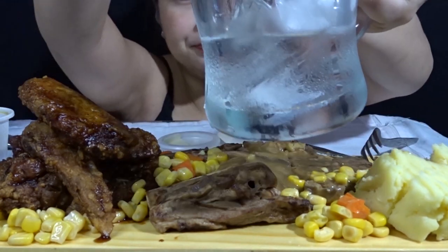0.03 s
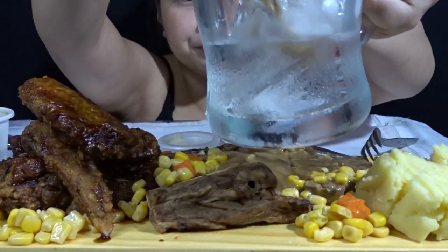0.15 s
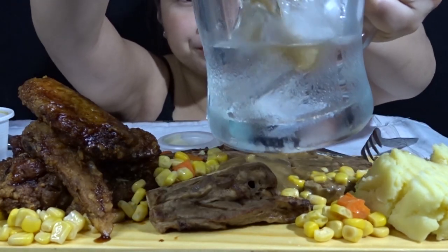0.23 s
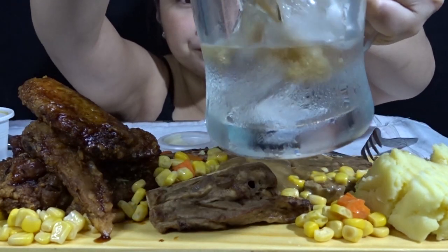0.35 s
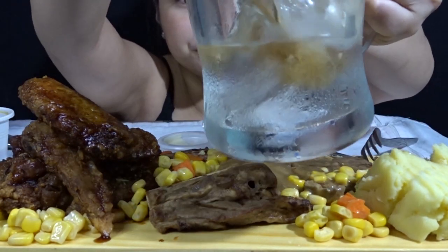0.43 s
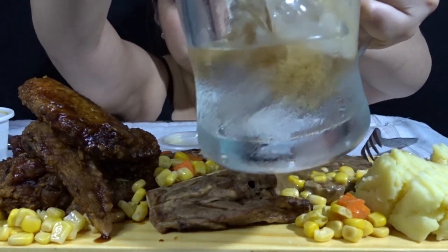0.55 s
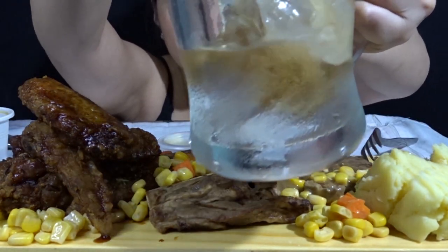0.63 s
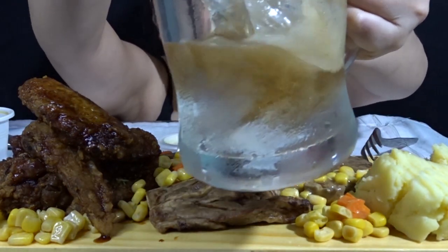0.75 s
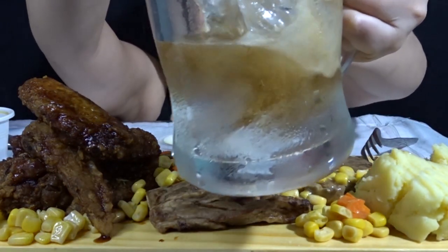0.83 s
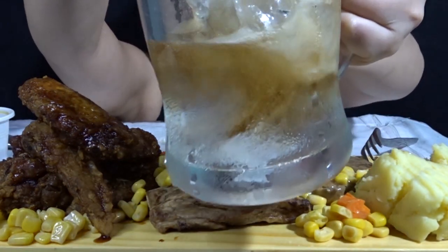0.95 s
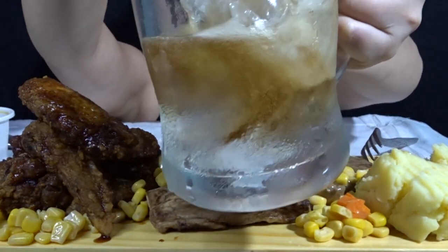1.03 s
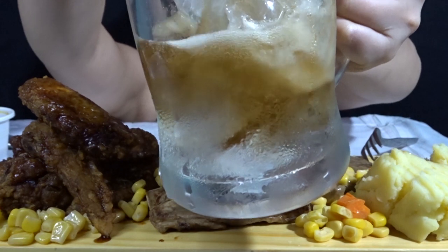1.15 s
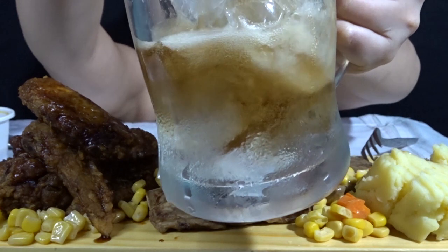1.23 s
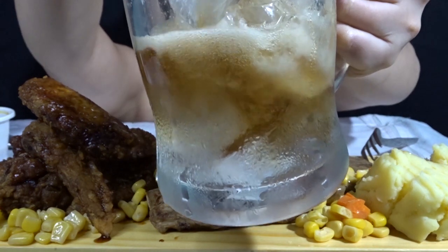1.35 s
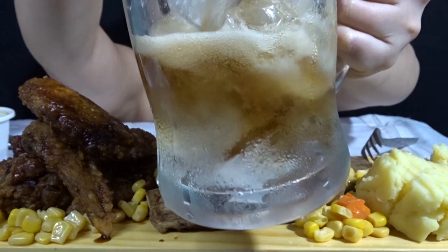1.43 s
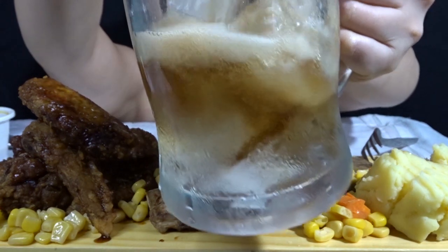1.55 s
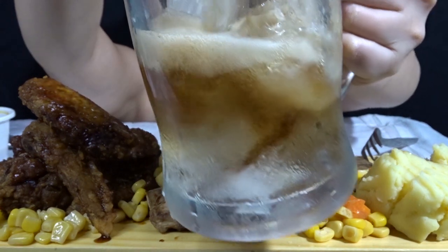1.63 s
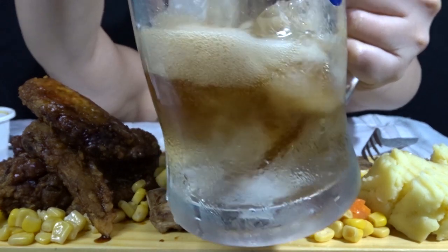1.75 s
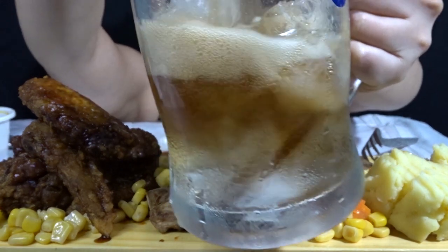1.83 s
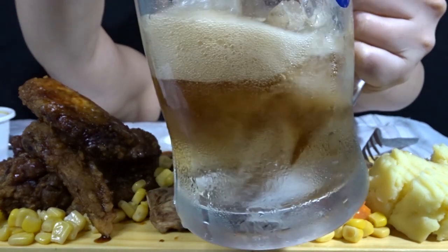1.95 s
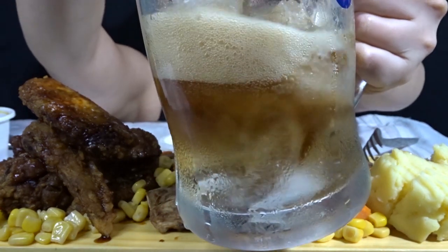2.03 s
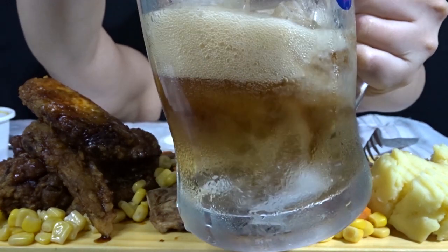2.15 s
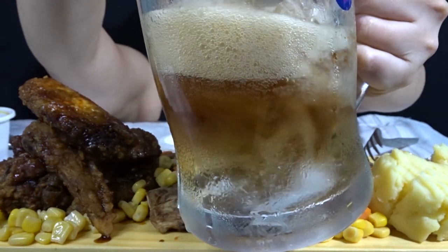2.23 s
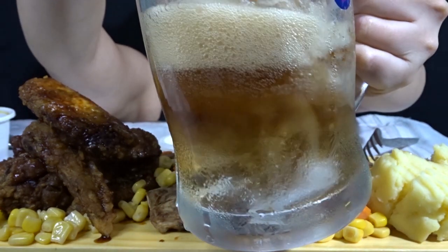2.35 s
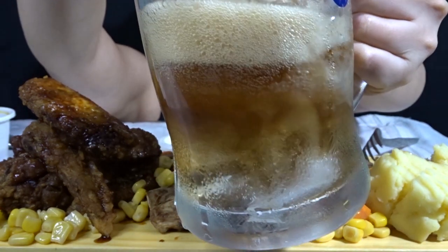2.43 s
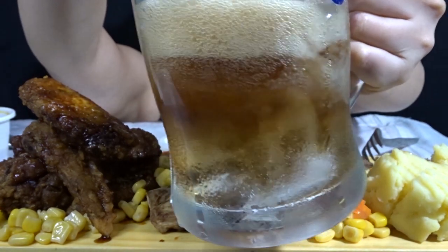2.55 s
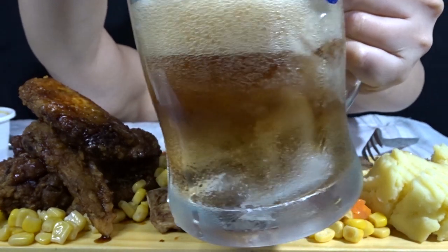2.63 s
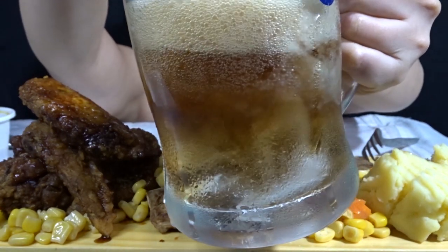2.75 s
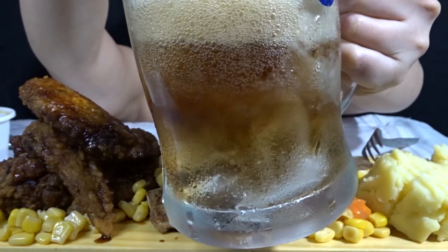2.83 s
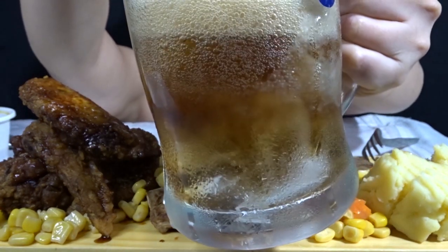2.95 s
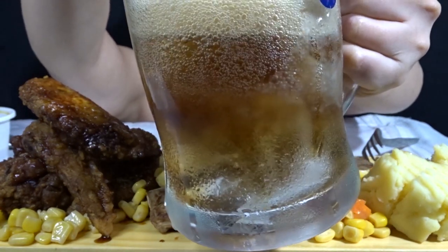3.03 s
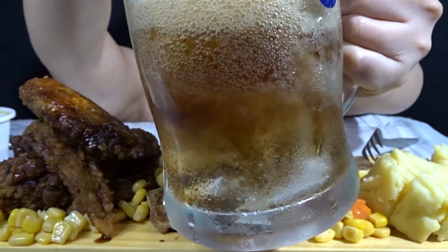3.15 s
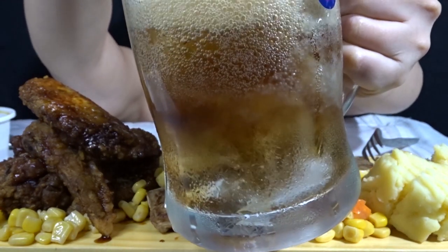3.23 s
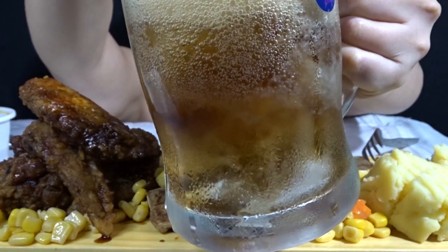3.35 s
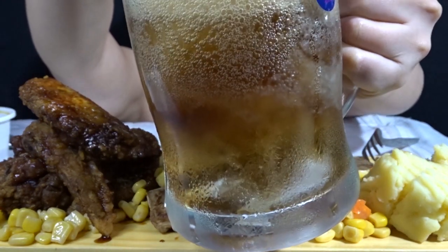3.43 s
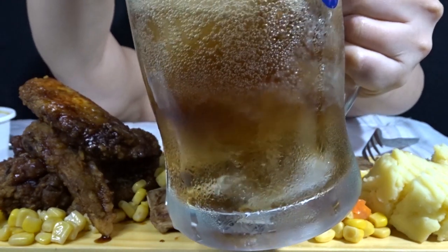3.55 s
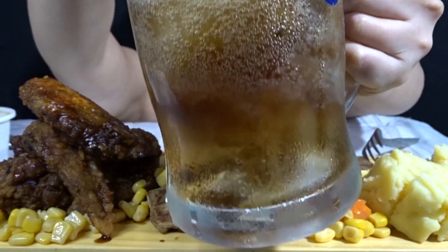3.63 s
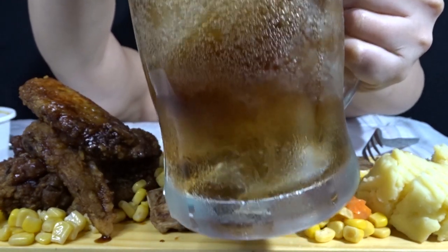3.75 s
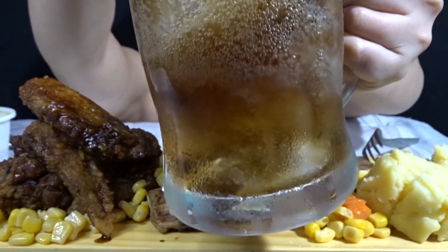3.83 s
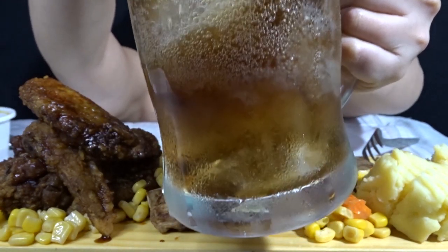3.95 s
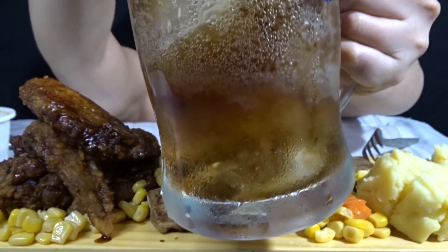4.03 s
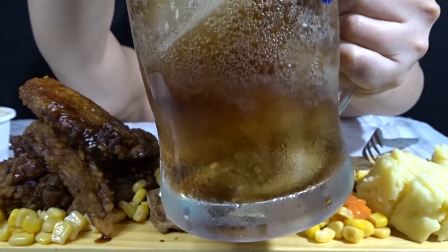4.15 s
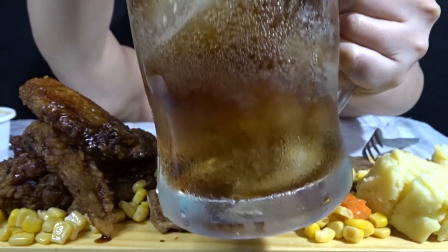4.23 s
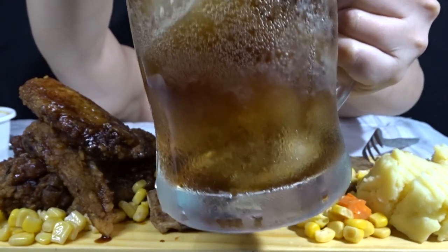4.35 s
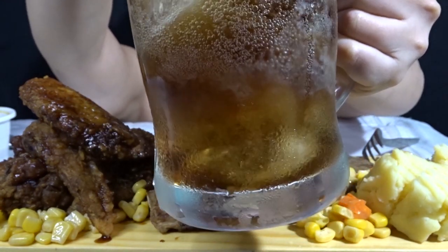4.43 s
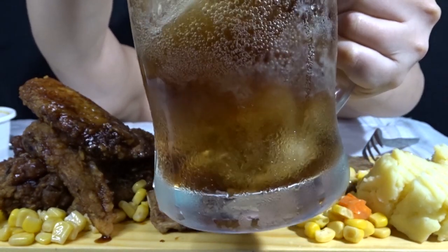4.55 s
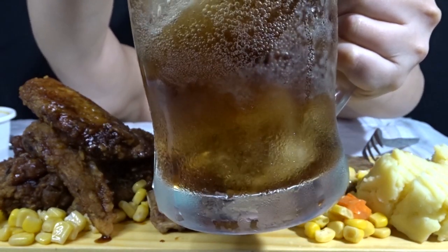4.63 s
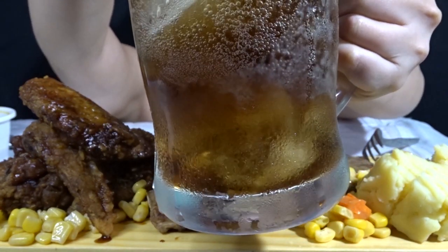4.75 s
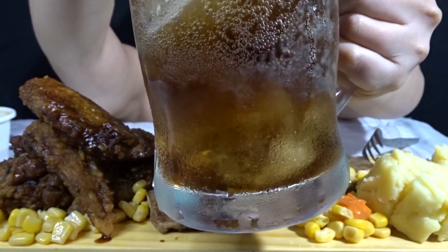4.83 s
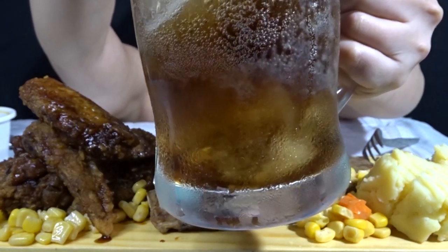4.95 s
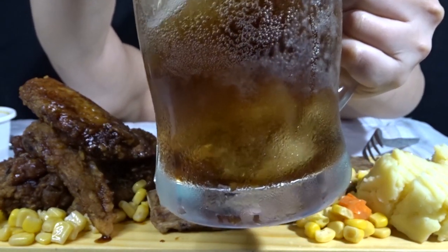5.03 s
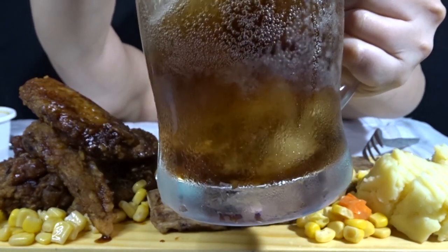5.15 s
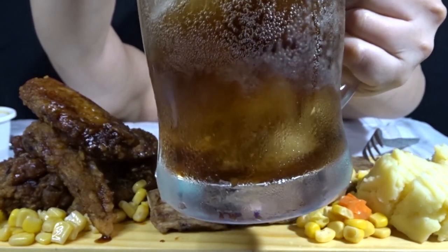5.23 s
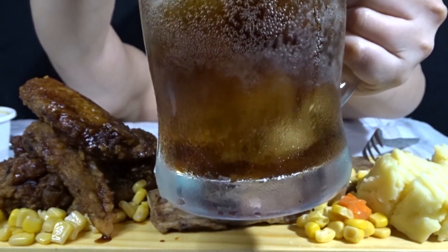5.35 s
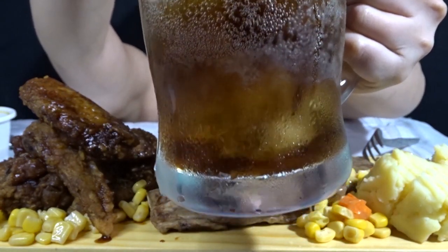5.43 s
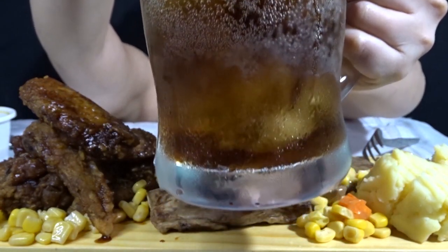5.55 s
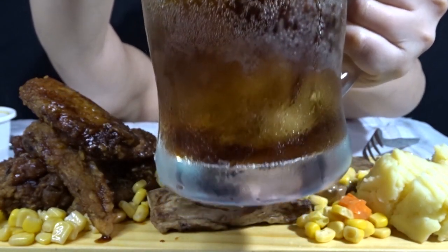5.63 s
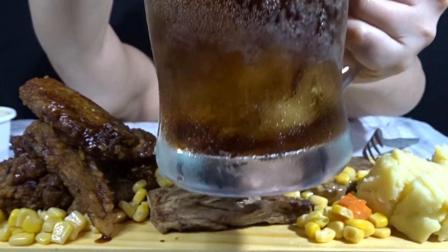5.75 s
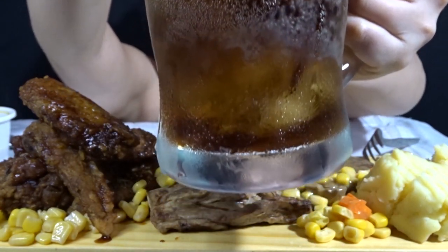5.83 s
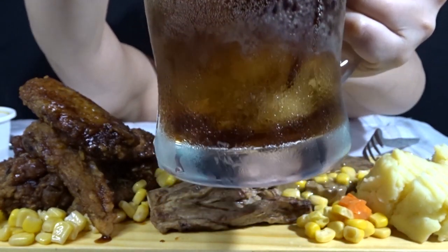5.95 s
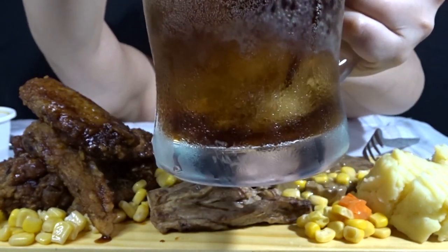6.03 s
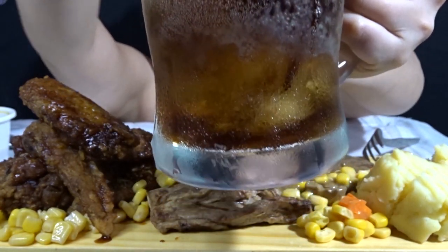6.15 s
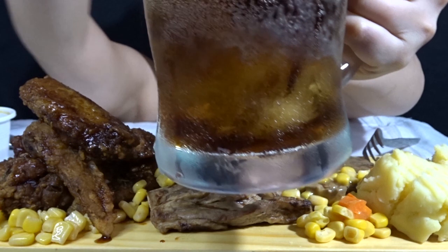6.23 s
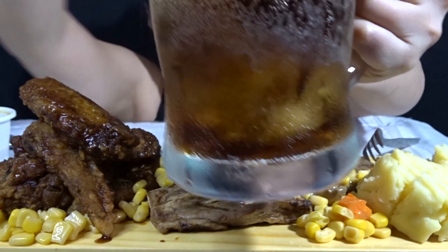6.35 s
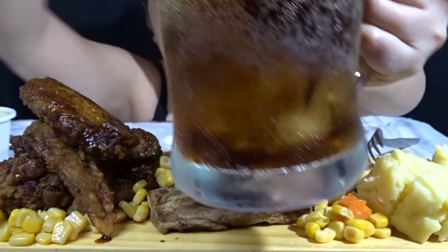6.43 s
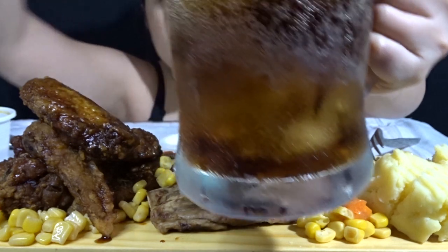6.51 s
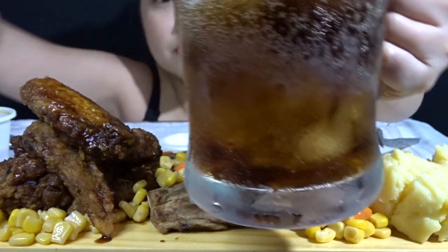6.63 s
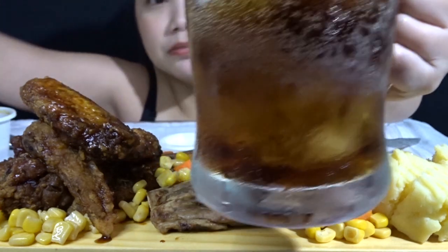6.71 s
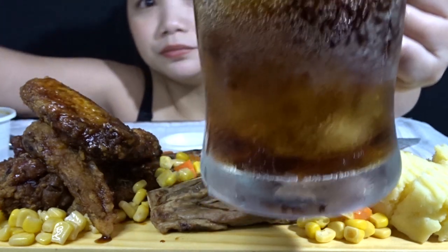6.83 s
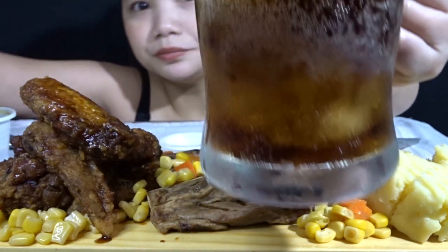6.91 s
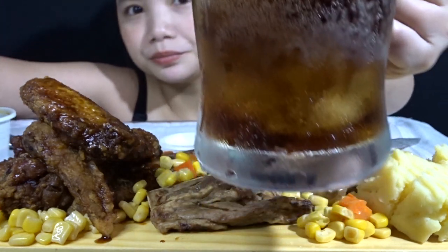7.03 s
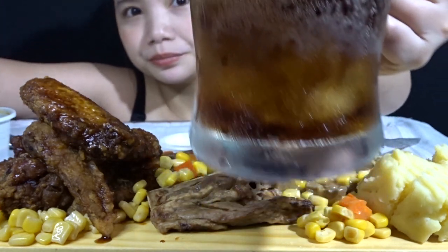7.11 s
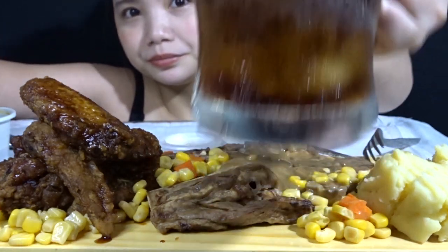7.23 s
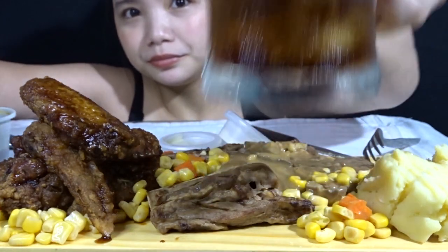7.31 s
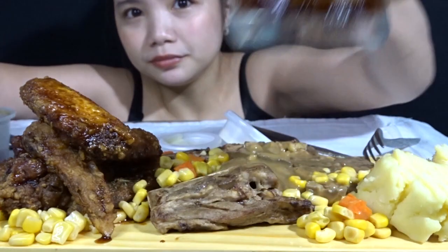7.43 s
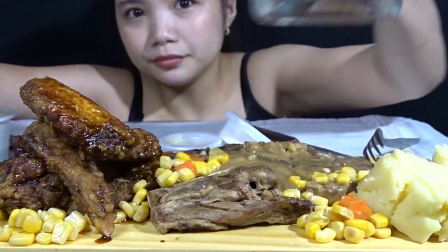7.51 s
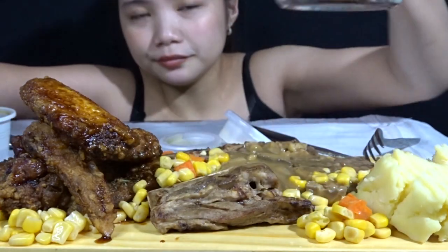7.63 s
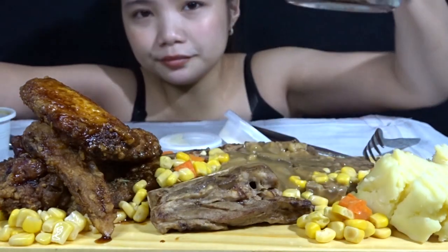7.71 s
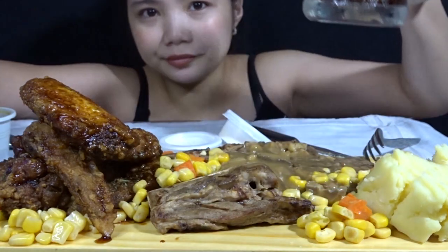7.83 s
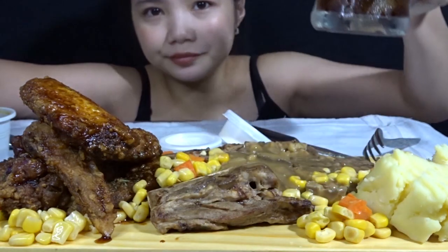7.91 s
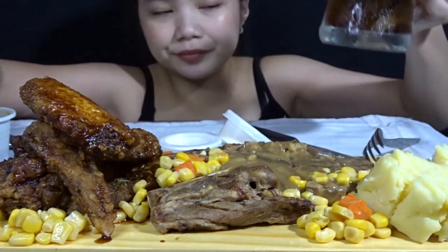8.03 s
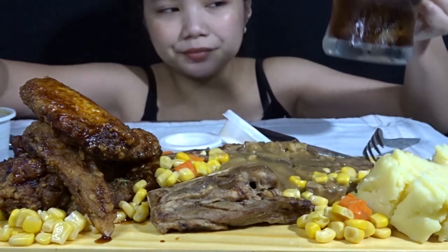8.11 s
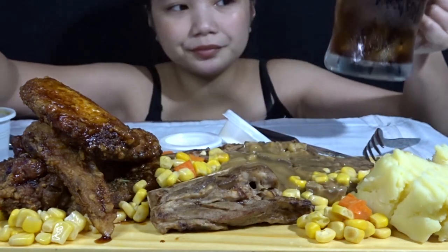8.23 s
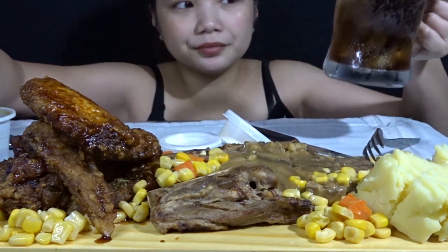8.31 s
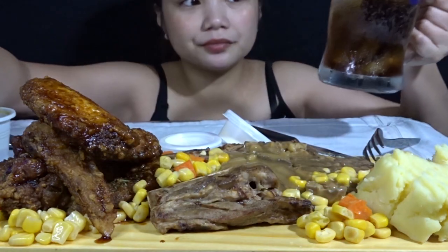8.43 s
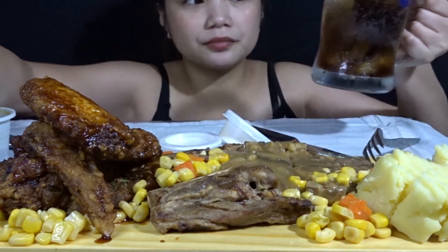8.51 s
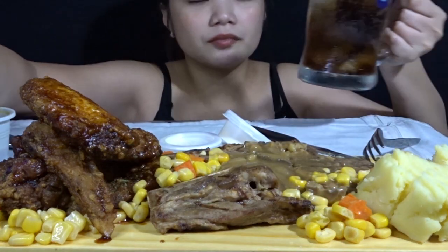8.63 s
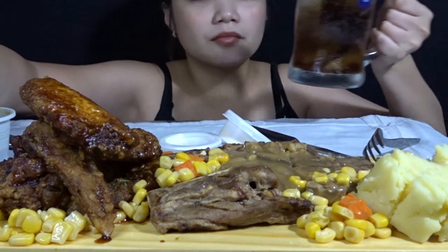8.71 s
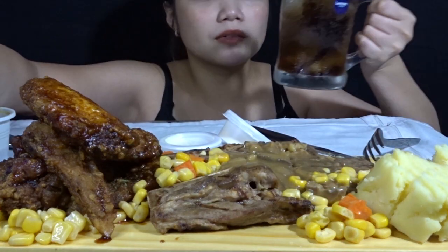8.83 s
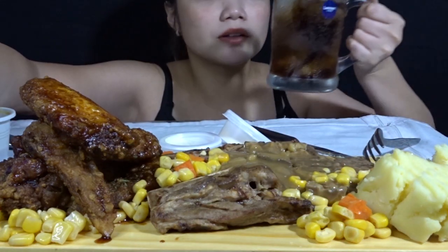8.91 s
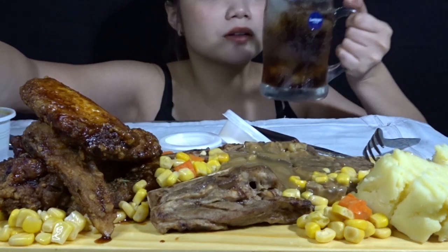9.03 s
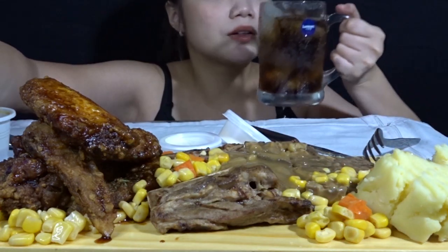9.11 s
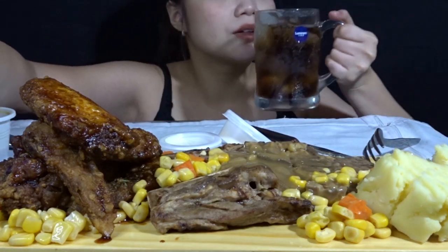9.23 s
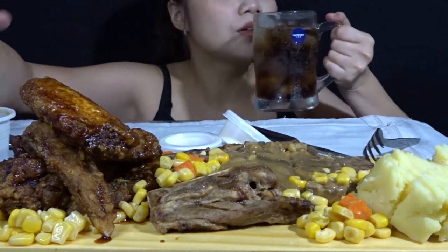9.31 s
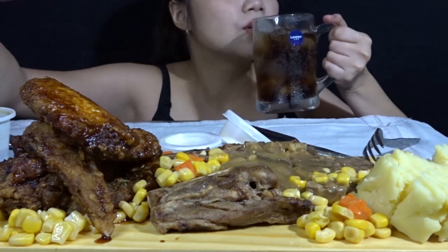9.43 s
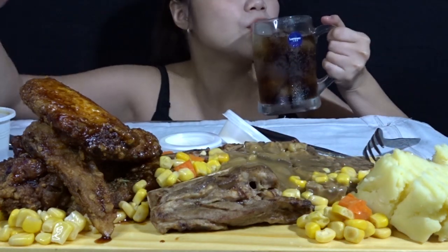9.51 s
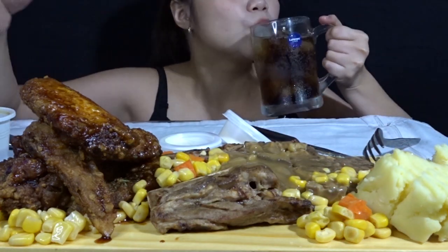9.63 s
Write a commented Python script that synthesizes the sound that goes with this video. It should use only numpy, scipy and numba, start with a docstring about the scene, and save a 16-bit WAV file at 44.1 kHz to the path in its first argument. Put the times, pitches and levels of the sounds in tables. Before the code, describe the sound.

Close-up carbonated pour over ice cubes: quick bubbly plops, dense bright fizz, sparse glassy clinks, then the hiss sinks into quiet room noise.

```python
"""Fizzy drink poured over ice.

A glass mug is held close to a stereo microphone in a quiet room. First splashes plop: rising, dying sines.
Foam then hisses: dense random clicks and noise in bands, coloured by moving resonances of the air above
the drink, whose pitch climbs as the mug fills. Cavities between the cubes gulp; ice thuds and knocks
as decaying modes and noise snaps. The mug is carried away and the hiss sinks into steady room noise."""
import sys
import numpy as np
from scipy import signal
from scipy.io import wavfile
from scipy.ndimage import uniform_filter1d
from numba import njit

SR = 44100
rng = np.random.default_rng(int(sys.argv[2]) if len(sys.argv) > 2 else 0)


def master(y):
    """Save y as 16-bit WAV."""
    cut = np.clip(np.atleast_2d(y).T, -1, 1)
    pcm = np.round(cut * 32767)  # scale
    wavfile.write(sys.argv[1], SR, pcm.astype(np.int16))


def natural_amplitude(level_db):
    """Convert a level in decibels to a linear amplitude factor, elementwise."""
    exponent = np.asarray(level_db, float) / 20
    return 10 ** exponent


N = 426447

# Levels in the tables are relative; each source adds its own trim.
# steady room noise: pitch_hz, density_db
ROOM_SPECTRUM = [(18, -68), (30, -28), (110, -15.5), (213, -18), (532, 1), (1140, -16), (1260, -8),
                 (1720, 2), (1970, -1.5), (3500, -1), (4200, -13), (6000, -5), (9190, -12), (12000, -11),
                 (14000, -15), (16000, -20)]
# its stereo width: pitch_hz, side_over_mid_db
ROOM_WIDTH = [(60, -9), (200, 2), (380, -17), (800, 11), (2000, 3), (4400, 7), (8000, 10), (15000, -2)]
# foam: time_s, hiss_db, fine_bubbles_db
FOAM_LEVELS = [(0, -57.5, -87), (.12, -66, -69), (.16, -51, -62), (.4, -45.5, -50), (.53, -37, -42.5),
               (.72, -32.5, -37.5), (1.0, -30, -37.5), (1.5, -30.5, -40.5), (2.1, -30.5, -39.5),
               (2.8, -30.5, -40.5), (3.4, -30.5, -40), (3.55, -29.5, -39), (3.8, -29.5, -39),
               (4.4, -30.5, -38.5), (5.55, -30.5, -40), (6.1, -31.5, -41.5), (6.3, -32.5, -42),
               (6.6, -32.5, -43.5), (7.05, -32.5, -44), (7.33, -28.5, -47), (7.45, -33, -47),
               (7.55, -34, -48.5), (7.75, -37, -49.5), (7.95, -40, -51.5), (8.1, -46.5, -53),
               (8.45, -47, -56), (8.55, -49, -56), (8.6, -47, -54), (8.7, -49, -62), (8.85, -58.5, -60.5),
               (9.67, -66.5, -67.5)]
# foam spectrum: pitch_hz, density_db
FOAM_SPECTRUM = [(25, -33), (60, -44), (150, -44.5), (240, -43.5), (330, -34), (430, -26), (600, -23),
                 (1000, -13.5), (1500, -6.5), (2000, -5.5), (2600, 0), (3500, -1), (5000, -2), (6800, -7),
                 (8200, -7.5), (9400, -9.5), (10300, -11.5), (11000, -15.5), (11800, -16), (12600, -22),
                 (13600, -20.5), (14800, -25.5), (16000, -31.5)]
# foam stereo width: pitch_hz, side_over_mid_db
FOAM_WIDTH = [(60, -3), (110, -2.5), (200, -19), (380, -11.5), (700, -10.5), (1290, -14), (2380, -21),
              (4400, -11.5), (8120, -13), (15000, -7)]
# drift of the bubble size mix: time_s, coarse_lift_db, middle_lift_db, left_over_right_db
BUBBLE_MIX = [(0, 7, 9, 3), (.3, -4, -2, -1.5), (.9, -3, 3.5, 0), (1.6, 1.5, -1, 0.43),
              (2.4, -3, 2.5, -0.1), (3.1, 5, 4, 0.5), (3.6, 2, 3.5, -0.2), (4.2, 5.5, -1, 0),
              (4.8, 3, -1.5, 0), (5.5, 3.5, -2.5, -0.1), (6.0, 1, -2.5, -0.2), (6.3, 3.5, -4, 1),
              (6.7, 0.5, -4.5, -1), (7.1, -4, -3, -1.5), (7.4, 2.5, -7, -1.16), (7.8, -3, -14.5, -2.5),
              (8.2, 3, -4, -1.5), (8.6, -0.5, -2, -1), (9.0, 3.5, -4.5, -0.5), (9.67, 11, 4, 1)]
# treble drift: time_s, mist_lift_db, top_lift_db, high_mode_hz, high_mode_db
TREBLE_DRIFT = [(0, 0, 0, 7000, 3), (.4, 2, -7, 7000, 1.5), (.8, 2, 1, 8600, 1), (1.5, 0.5, -2, 9200, 3),
                (2.0, -2.5, 0, 7800, -2.5), (2.4, 1, 1, 8140, 3), (3.0, 2, 2, 9070, 4),
                (3.6, -1, 4.5, 9900, 4), (4.3, -1, 1, 10000, 2), (5.5, 0.5, 2, 10000, 3.5),
                (6.2, 2.5, -1, 10000, 0.5), (7.2, 2.5, 1, 10500, -0.5), (7.8, 1, 7, 11600, 2),
                (8.3, 5, 4.5, 11500, -1), (8.9, -3, -2, 7400, -3), (9.67, 0, -2, 7400, 1)]
# air modes of the mug: time_s, column_db, cross_hz, cross_db, rim_db
AIR_MODES = [(0, -2, 2300, -4, -3), (.36, 17, 2240, 17, 5), (.45, 24, 2230, 11.5, 6),
             (.7, 20.5, 2440, 13.5, 13.5), (.85, 19, 2440, 12, 10), (.9, 19.5, 2557, 16.5, 10),
             (1.0, 11.5, 2750, 8.5, 11), (1.3, 16.5, 3010, 5, 5.5), (1.7, 13, 3170, 2.5, 3),
             (2.0, 12.5, 2370, 7.5, 2.5), (3.4, 5, 2790, 4.5, 2), (3.65, 6, 2676, 4.5, 4.5),
             (4.0, 3.5, 2460, 4.5, 5.5), (7.4, 5, 2260, 5, 5.5), (7.5, 5, 2510, 4, 6),
             (7.53, 6, 5060, 4, 7), (7.75, 13, 4900, 6.5, 9), (7.95, 9, 4900, 7.5, 8),
             (8.1, 10, 5300, 6, 6), (8.2, 6, 5300, 7, 8), (8.35, 6, 5200, 6, 11), (8.5, 3, 5200, 4, 12),
             (8.6, 5.5, 5020, 2.5, 6), (9.67, 16.5, 5000, 4, -1)]
# drops spattering on bare ice, then cubes rattling: time_s, level_db
SPATTER_LEVELS = [(0, -78.5), (.12, -78), (.15, -52), (.2, -53), (.24, -50), (.3, -53), (.37, -49),
                  (.44, -42.5), (.52, -32), (.75, -53), (1.2, -49), (3.5, -56), (7.0, -45), (7.5, -47.5),
                  (7.7, -53), (7.95, -56), (8.05, -62), (8.2, -75.5), (8.5, -62), (8.55, -68), (8.66, -58),
                  (8.7, -50), (8.75, -59.5), (8.85, -67), (9.67, -69.5)]
# short broad clicks, most at the onset of splashes and knocks: start_s, level_db, centre_hz
ONSET_CLICKS = [(0.1369, -38, 3000), (.169, -34, 4500), (.187, -27, 5000), (0.2537, -30, 2600),
                (.267, -36.5, 2500), (.2815, -41, 2000), (.4045, -34, 2000), (.424, -37, 2200),
                (.151, -39, 2600), (.2235, -40, 4000), (.3045, -42, 4500), (0.379, -31.5, 2500),
                (.554, -26, 2400), (.6635, -26, 4000), (.695, -36.5, 2500), (0.526, -11.5, 4600),
                (.583, -27.5, 5000), (.624, -20.5, 4200), (.683, -16, 4520), (.705, -20, 6000),
                (0.7426, -26, 3020), (.783, -25, 5500), (0.879, -27, 1860), (3.5313, -25, 1600),
                (7.456, -20.5, 2000), (7.443, -26.5, 1300), (7.462, -25, 2800), (7.607, -32, 2400),
                (7.612, -32, 4000), (7.734, -33, 2600), (7.8125, -28, 2600), (7.838, -25, 3500),
                (7.991, -34, 3500), (8.006, -30, 4000), (8.135, -38, 4970), (8.24, -34.5, 4000),
                (8.246, -33, 3500), (8.686, -26, 4300), (8.7028, -29, 4000), (8.908, -40, 7500),
                (9.078, -46.5, 10000), (8.7075, -30.5, 4500), (9.3561, -38, 1700), (9.375, -44, 3200),
                (9.489, -40, 1900)]
# splashes: start_s, first_bubble_db, first_bubble_hz, second_bubble_db, second_bubble_hz
SPLASHES = [(.137, -45, 1745, -47, 3170), (0.151, -35, 2700, -36.5, 3130), (.157, -45, 2610, -38, 4360),
            (.169, -26.5, 2443, -38.5, 2940), (0.188, -32.5, 3120, -23.5, 3330),
            (.196, -29, 3600, -36, 4300), (.207, -40, 2660, -29, 4400), (.215, -38, 2500, -37.5, 3400),
            (0.2233, -33.5, 1260, -44, 3230), (.253, -29.5, 1544, -37, 3190),
            (.265, -31, 1635, -46.5, 3450), (.279, -33, 1250, -48, 3180), (0.3048, -13, 1850, -24, 3560),
            (.319, -29, 1870, -40.5, 3500), (.333, -28, 1800, -42.5, 5500), (.343, -33, 1900, -36, 3300),
            (.355, -42.5, 2100, -42, 3700), (.378, -21, 1170, -33, 3700), (0.381, -18, 1910, -29, 2600),
            (0.404, -26, 1008, -46.5, 3530), (0.423, -23, 2450, -38.5, 4580), (.435, -36, 3300, -36, 4500),
            (0.458, -31.5, 1005, -29, 3600), (0.489, -19, 2400, -36, 3730), (0.5259, -16, 1900, -11, 4350),
            (0.5264, -23.5, 6330, -31, 3000), (.554, -17.5, 2320, -35, 3640), (.572, -28, 3800, -24, 3610),
            (.579, -28, 3500, -26, 4900), (.587, -25, 2112, -34, 3600), (.6235, -25.5, 1190, -23, 3740),
            (.6635, -17, 3480, -28, 4000), (0.6832, -20, 3910, -16, 4400), (.695, -15.5, 2280, -33, 3630),
            (.704, -25.5, 2430, -30, 6500), (0.718, -20, 3680, -24, 3650), (0.7408, -20, 2370, -22, 3260),
            (.7825, -28, 7500, -16, 5000), (.832, -19, 3330, -36, 4000), (.845, -22, 3430, -36, 4000),
            (0.8812, -14.5, 2140, -19, 3270), (.889, -20, 2600, -34, 3300), (.912, -26.5, 2650, -34, 3500)]
# drink closing over cavities between cubes: start_s, level_db, pitch_hz
CAVITIES = [(0.386, -32, 1000), (0.407, -37, 1000), (.455, -31, 955), (.47, -32, 955), (.488, -25, 932),
            (0.501, -30, 950), (0.479, -28, 1150), (0.494, -25, 1306), (0.503, -26, 1466),
            (0.514, -39, 992), (.955, -28, 1100), (0.97, -28, 1120), (1.391, -54, 338), (1.88, -46, 537),
            (2.74, -47, 304), (3.45, -56, 350), (4.079, -53.5, 312), (4.15, -65, 160.5), (4.2, -56, 268),
            (4.3, -58, 380), (4.64, -48, 433), (4.672, -54, 436), (5.369, -60.5, 310), (6.21, -55.5, 332),
            (7.82, -58.5, 143), (9.42, -50, 494)]
# a large cube bumping the wall bluntly: start_s, level_db, pitch_hz
ICE_THUDS = [(1.6033, -11, 947), (7.4415, -40, 724)]
# ice on glass: start_s, bright_db, bright_hz, dull_db
ICE_KNOCKS = [(1.6053, -23, 3000, -33), (3.5306, -18, 2320, -36), (3.699, -43, 2780, -37),
              (3.863, -16, 3340, -35), (4.4923, -34, 3530, -30), (4.6914, -29, 3310, -45),
              (4.8495, -26, 2230, -36.5), (5.257, -12.5, 2530, -28), (5.8571, -25, 2170, -55),
              (6.2097, -28, 3310, -36), (7.442, -23, 3600, -39), (7.457, -16, 2540, -52.5),
              (7.4624, -17, 2460, -41), (7.5713, -34, 1800, -55.5), (7.607, -23.5, 3270, -47.5),
              (7.7137, -41, 3460, -47), (7.7332, -29, 2020, -46), (7.8124, -31, 3623, -47),
              (7.837, -31, 3100, -61), (7.896, -32, 3600, -52), (8.1404, -47, 3250, -48),
              (8.456, -35, 3600, -68), (8.528, -34, 4400, -68), (8.533, -40.5, 2300, -67),
              (8.577, -33, 4400, -67.5), (8.59, -40, 3000, -70), (8.6093, -37, 2540, -57.5),
              (8.6533, -36, 2600, -58.5), (8.662, -34, 2500, -58), (8.6848, -26, 3830, -57),
              (8.6948, -32.5, 2460, -50), (8.7025, -31, 3800, -54), (8.7044, -25.5, 2500, -59),
              (8.7075, -37.5, 3600, -53.5), (8.719, -46, 2300, -47.5), (8.806, -45, 3500, -65),
              (8.8691, -45, 2425, -60.5), (8.934, -41, 3970, -63.5), (8.961, -42.5, 2270, -63.5),
              (9.0843, -40.5, 2380, -70.5), (9.12, -48, 2800, -66), (9.288, -47, 2290, -49),
              (9.3551, -36, 2322, -61), (9.363, -48, 1800, -61), (9.372, -44, 2490, -62),
              (9.4886, -46.5, 2620, -62)]
# modes of the mug: pitch_hz, level_db, t60_s
MUG_MODES = [(830, -20, 0.1), (1800, -4.5, 0.04), (2450, -4, 0.038), (4470, -20, .008)]

ROOM_DB = -58.5
ECHO_T60_S, ECHO_DB = 0.26, -10
HITS_LOW_CUT_HZ, TOP_HZ = 485, 15900

# the air column shortens while the drink runs, fastest at first, as the foam climbs
POUR_END_S, AIR_START_M, AIR_END_M, FILL_POWER = 4.3, 0.092, 0.045, 0.68
AWAY_START_S, AWAY_END_S = 6.8, 7.3   # the mug is lifted and its mouth turns

# mode widths (bare ice, full foam head): foam damps the column and cross modes
COLUMN_WIDTH_HZ, CROSS_WIDTH_HZ, RIM_WIDTH_HZ = (70, 600), (110, 850), (770, 700)
DAMPING_POWER = 1.02
RIM_HZ, HIGH_MODE_WIDTH_HZ = 3450, 1600
# the foam has sunk and the rim mode sharpens
RIM_CLEAR_HZ, RIM_CLEAR_WIDTH_HZ = 3600, 326
RIM_CLEARS_START_S, RIM_CLEARS_END_S = 8.1, 8.41

HISS_REFERENCE_DB, FINE_REFERENCE_DB = -28, -38
COARSE_DB, COARSE_SHARE_OF_HISS_SWING = -32, 0.43
MIST_DB, MIST_SHARE_OF_FINE_SWING, MIST_AWAY_LIFT_DB = -31.5, 0.8, 1
COARSE_SWELL_DB, TREBLE_SWELL_DB = 1.3, 0.6
CRACKLES_PER_S, CRACKLE_DB = 300.0, -16.5   # larger bursts that stand out of the hiss
BUBBLE_CENTRES_HZ = [800, 1700, 4500, 8500, 11800, 14500]

SPATTER_TILT, SPATTER_SPREAD_DB = 0.4, 3.6

CLICK_CYCLES, CLICK_SPRAY_DB = 10, -10
CLICK_EDGE_DB, CLICK_EDGE_CYCLES = 4, 4

FIRST_ATTACK_S, FIRST_RISE_PER_CYCLE = 0.0014, 0.003
SECOND_ATTACK_S, SECOND_RISE_PER_CYCLE = 0.00057, 0.00494
SPLASH_CRACK_DB = -8   # crack over the louder bubble

# for a 1 kHz cavity
GULP_T60_S, GULP_ATTACK_S, GULP_RISE_PER_S = 0.07, 0.001, 7.6
LARGER_IS_SLOWER_POWER = 0.47
GULP_BREAKS_BELOW_HZ, GULP_STEADY_SHARE = 600, 0.4

THUD_CYCLES = 5.6

KNOCK_CYCLES, OVERTONE_RATIO, OVERTONE_DB = 38.5, 1.29, -12   # bright ring
DULL_HZ, DULL_T60_S = 1420, 0.0093
# from here on the dull ring is the mug's low ring
MUG_RING_FROM_S = 7.55
MUG_RING_HZ, MUG_RING_T60_S, MUG_RING_DB = 803, 0.05, -10.5
SNAP_DB, LATE_SNAP_DB = 6, 7.5   # over the mean of bright and dull
MODE_SCATTER_DB = 3.0


def rms_one(x):
    """Scales to an rms of 1."""
    return x / np.sqrt(np.mean(x ** 2) + 1e-20)


def in_time(rows):
    """Interpolates the columns of a table to one value a sample."""
    time_s, *columns = np.transpose(rows)
    return [np.interp(np.arange(N) / SR, time_s, column) for column in columns]


def at_hz(points, hz):
    """Reads a spectrum on a log-frequency axis."""
    points = np.array(points, float)
    return np.interp(np.log(hz), np.log(np.maximum(points[:, 0], 1)), points[:, 1])


def ramp(start_s, end_s):
    """0 before, 1 after, straight between."""
    return np.clip((np.arange(N) / SR - start_s) / (end_s - start_s), 0, 1)


def drift(rate_hz):
    """Slow chance: noise at SR / 40 through a double one-pole low-pass; rms 1."""
    r = np.exp(-80 * np.pi * rate_hz / SR)
    noise = rng.standard_normal(N // 40 + 2002)
    slow = signal.lfilter([1], [1, -2 * r, r * r], noise)[2000:]
    return np.interp(np.arange(N) / 40, np.arange(len(slow)), rms_one(slow))


def bursts(per_s, spread_db):
    """Random clicks of very unequal size and either sign; rms 1."""
    sizes = natural_amplitude(spread_db * np.minimum(rng.exponential(1, N), 5)) * rng.choice([-1, 1], N)
    return rms_one(sizes * (rng.random(N) < per_s / SR) + 1e-18)


def coloured(pairs, spectrum, width, moving_db):
    """Sums bands of (mid, side) pairs dealt in turn, each with its own level and stereo width."""
    edges_hz = np.r_[np.geomspace(30, 190, 4), np.geomspace(250, 6200, 15), np.arange(7100, 17000, 900)]
    out = 0
    for k, (low_hz, high_hz) in enumerate(zip(edges_hz, edges_hz[1:])):
        sos = signal.butter(2, [low_hz, high_hz], "band", fs=SR, output="sos")
        mid, side = signal.sosfilt(sos, pairs[k % len(pairs)])
        hz = np.sqrt(low_hz * high_hz)
        gain = natural_amplitude(at_hz(spectrum, hz) + moving_db(hz))
        out = out + gain * np.array([mid, natural_amplitude(at_hz(width, hz)) * side])
    return out


@njit
def resonate(x, radians, r):
    """A two-pole resonance whose centre (radians a sample) and pole radius move; gain 1 on top."""
    y = np.zeros(len(x))
    for i in range(2, len(x)):
        drive = (1 - r[i] ** 2) / 2 * (x[i] - x[i - 2])
        y[i] = drive + 2 * r[i] * np.cos(radians[i]) * y[i - 1] - r[i] ** 2 * y[i - 2]
    return y


def ring(hz, t60_s, rise_per_s=0.0, attack_s=0.00025):
    """A dying sine; a bubble's pitch rises as it closes."""
    t = np.arange(int(0.15 * SR)) / SR
    sine = np.sin(2 * np.pi * hz * t * (1 + rise_per_s * t))
    return sine * natural_amplitude(-60 * t / max(t60_s, 0.0004)) * (1 - np.exp(-t / attack_s))


def crack(t60_s, top_hz):
    """A dying snap of noise, dull above top_hz."""
    snap = rng.standard_normal(600) * natural_amplitude(-60 * np.arange(600) / SR / t60_s)
    return signal.lfilter(*signal.butter(2, top_hz, fs=SR), snap)


def add(track, start_s, sound):
    """Lays a sound on the track."""
    i = round(start_s * SR)
    track[i:i + len(sound)] += sound[:N - i]


def through_air(x):
    """The air in the mug lifts its modes: a quarter-wave column, a cross, a rim and a high mode."""
    column_db, cross_hz, cross_db, rim_db = in_time(AIR_MODES)
    high_hz, high_db = in_time(TREBLE_DRIFT)[2:]
    full = ramp(0, POUR_END_S)
    column_m = AIR_START_M + (AIR_END_M - AIR_START_M) * full ** FILL_POWER
    column_hz = 343 / 4 / column_m   # speed of sound in m/s
    damping = full ** DAMPING_POWER
    column_width_hz, cross_width_hz, rim_width_hz = [
        bare + (foamy - bare) * damping for bare, foamy in (COLUMN_WIDTH_HZ, CROSS_WIDTH_HZ, RIM_WIDTH_HZ)]
    clear = ramp(RIM_CLEARS_START_S, RIM_CLEARS_END_S)
    rim_hz = RIM_HZ + (RIM_CLEAR_HZ - RIM_HZ) * clear
    rim_width_hz = rim_width_hz + (RIM_CLEAR_WIDTH_HZ - rim_width_hz) * clear
    modes = [(column_hz, column_db, column_width_hz),
             (cross_hz, cross_db, cross_width_hz),
             (rim_hz, rim_db, rim_width_hz),
             (high_hz, high_db, np.full(N, float(HIGH_MODE_WIDTH_HZ)))]
    out = x.copy()
    for hz, db, width_hz in modes:
        out += (natural_amplitude(db) - 1) * resonate(x, 2 * np.pi * hz / SR, np.exp(-np.pi * width_hz / SR))
    return out


def room_tone():
    """Wide steady air and microphone hiss: noise in bands."""
    noise = rng.standard_normal((2, 2, N))
    mid, side = coloured(noise, ROOM_SPECTRUM, ROOM_WIDTH, lambda hz: 0)
    return natural_amplitude(ROOM_DB) * np.array([mid + side, mid - side]) / np.std(mid)


def foam():
    """Thousands of bubbles burst each second, in surges; size mix and level follow the pour."""
    hiss_db, fine_db = in_time(FOAM_LEVELS)
    coarse_lift_db, middle_lift_db, pan_db = in_time(BUBBLE_MIX)
    mist_lift_db, top_lift_db = in_time(TREBLE_DRIFT)[:2]
    away = ramp(AWAY_START_S, AWAY_END_S)
    coarse_db = COARSE_DB + COARSE_SHARE_OF_HISS_SWING * (hiss_db - HISS_REFERENCE_DB) + coarse_lift_db
    mist_db = MIST_DB + MIST_SHARE_OF_FINE_SWING * (fine_db - FINE_REFERENCE_DB) + MIST_AWAY_LIFT_DB * away
    sizes_db = np.array([coarse_db, hiss_db + middle_lift_db, hiss_db, fine_db + 10.0,
                         mist_db + mist_lift_db, mist_db + top_lift_db])

    crackle = natural_amplitude(CRACKLE_DB) * bursts(CRACKLES_PER_S, spread_db=1.5)
    side_crackle = crackle * drift(30.0)   # each burst sits a little left or right
    pairs = [[bursts(14000.0, spread_db=2.5) + crackle, rng.standard_normal(N) + side_crackle]
             for _ in range(2)]
    surge_db = 0.5 * drift(12.5) + 0.5 * drift(42.0) + 0.5 * drift(120.0)
    treble_swell = drift(3.6)

    def moving_db(hz):
        """Smaller bubbles sound higher: each band blends the two nearest sizes."""
        shares = [np.interp(np.log(hz), np.log(BUBBLE_CENTRES_HZ), row) for row in np.eye(len(sizes_db))]
        treble_share = sum(shares[3:])
        band_swell_db = (0.45 + COARSE_SWELL_DB * shares[0]) * drift(5.3)
        level_db = np.dot(shares, sizes_db) + (1 - 0.78 * treble_share) * surge_db
        return level_db + band_swell_db + TREBLE_SWELL_DB * treble_share * treble_swell

    mid, side = natural_amplitude(9.5) * coloured(pairs, FOAM_SPECTRUM, FOAM_WIDTH, moving_db)
    lifted = through_air(mid)
    # the modes recolour the hiss without adding power to it
    dry_power, lifted_power = [uniform_filter1d(v ** 2, size=SR // 4) + 1e-18 for v in (mid, lifted)]
    mid = lifted * np.sqrt(dry_power / lifted_power)
    return np.array([natural_amplitude(pan_db / 2) * (mid + side), natural_amplitude(-pan_db / 2) * (mid - side)])


def spatter():
    """Uneven small hits, each ringing a few cycles at one of 14 pitches."""
    clicks = bursts(900.0, spread_db=SPATTER_SPREAD_DB)
    dealt = rng.integers(0, 14, N)
    rings = np.zeros(N)
    for k, hz in enumerate(np.geomspace(1500.0, 6500.0, 14)):
        hits = signal.fftconvolve(clicks * (dealt == k), ring(hz, 11.3 / hz))[:N]
        rings += hits * (hz / 2000) ** SPATTER_TILT
    return natural_amplitude(in_time(SPATTER_LEVELS)[0]) * rms_one(rings)


def onset_clicks():
    """Short broad clicks: a brief ring, a briefer sharp edge and a spray of noise."""
    out = np.zeros(N)
    for start_s, db, hz in ONSET_CLICKS:
        body = ring(hz, CLICK_CYCLES / hz)
        edge = ring(hz, CLICK_EDGE_CYCLES / hz, attack_s=0.00002)
        add(out, start_s, natural_amplitude(db) * (body + natural_amplitude(CLICK_EDGE_DB) * edge))
        add(out, start_s, natural_amplitude(db + CLICK_SPRAY_DB) * crack(0.0033, 8000.0))
    return out


def plops():
    """Each splash rings two trapped bubbles and cracks into the air of the mug."""
    bubbles, cracks = np.zeros(N), np.zeros(N)
    for start_s, first_db, first_hz, second_db, second_hz in SPLASHES:
        first_t60_s = 0.013 * (2000 / first_hz) ** 0.23
        first = ring(first_hz, first_t60_s, FIRST_RISE_PER_CYCLE * first_hz, FIRST_ATTACK_S)
        second = ring(second_hz, 23.5 / second_hz, SECOND_RISE_PER_CYCLE * second_hz, SECOND_ATTACK_S)
        add(bubbles, start_s, natural_amplitude(first_db + 7.0) * first)
        add(bubbles, start_s, natural_amplitude(second_db + 10.5) * second)
        crack_db = SPLASH_CRACK_DB + max(first_db, second_db - 3.0)
        add(cracks, start_s, natural_amplitude(crack_db) * crack(0.0025, 7000.0))
    return bubbles + natural_amplitude(-10.0) * through_air(cracks)


def glugs():
    """Soft gulps; a larger cavity sounds lower, swells and dies slower and rises less."""
    out = np.zeros(N)
    for start_s, db, hz in CAVITIES:
        slow = (1000 / hz) ** LARGER_IS_SLOWER_POWER
        gulp = ring(hz, GULP_T60_S * slow, GULP_RISE_PER_S / slow ** 2, GULP_ATTACK_S * slow)
        if hz <= GULP_BREAKS_BELOW_HZ:   # a large cavity breaks up
            wobble = rms_one(uniform_filter1d(rng.standard_normal(len(gulp)), size=int(SR / hz)))
            gulp = gulp * (GULP_STEADY_SHARE + (1 - GULP_STEADY_SHARE) * wobble)
        add(out, start_s, natural_amplitude(db) * gulp)
    return out


def thuds():
    """Blunt bumps of a large cube: a few cycles that barely ring."""
    out = np.zeros(N)
    for start_s, db, hz in ICE_THUDS:
        add(out, start_s, natural_amplitude(db) * ring(hz, THUD_CYCLES / hz))
    return out


def knocks():
    """Each knock is a snap, a bright ring and a dull one (late, the mug's low ring), and modes of the mug."""
    out = np.zeros(N)
    for start_s, db, hz, dull_db in ICE_KNOCKS:
        t60_s = KNOCK_CYCLES / hz
        bright = ring(hz, t60_s) + natural_amplitude(OVERTONE_DB) * ring(hz * OVERTONE_RATIO, t60_s)
        if start_s < MUG_RING_FROM_S:
            dull, snap_db = ring(DULL_HZ, DULL_T60_S), SNAP_DB
        else:
            dull, snap_db = natural_amplitude(MUG_RING_DB) * ring(MUG_RING_HZ, MUG_RING_T60_S), LATE_SNAP_DB
        add(out, start_s, natural_amplitude(db + 3.5) * bright)
        add(out, start_s, natural_amplitude(dull_db + 10.0) * dull)
        add(out, start_s, natural_amplitude((db + dull_db) / 2 + snap_db) * crack(0.004, 5600.0))
        for mode_hz, mode_db, mode_t60_s in MUG_MODES:
            level_db = min(db, dull_db + 5.5) + mode_db + rng.normal(0, MODE_SCATTER_DB)
            add(out, start_s, natural_amplitude(level_db) * ring(mode_hz, mode_t60_s))
    return out


def echoes(x):
    """The room answers with a short dying noise tail, unlike on each side."""
    t = np.arange(int(0.3 * SR)) / SR
    tail = rng.standard_normal((2, len(t))) * natural_amplitude(-60 * t / ECHO_T60_S) * (t > 0.004)
    tail /= np.sqrt(np.sum(tail ** 2, axis=1, keepdims=True))
    return natural_amplitude(ECHO_DB) * signal.fftconvolve(x[None], tail, axes=1)[:, :N]


def scene():
    """Foam, splashes and ice in the room; hits are thin in the bass, gulps keep theirs."""
    hits = spatter() + onset_clicks() + plops() + thuds() + knocks()
    low_cut = signal.butter(4, HITS_LOW_CUT_HZ, "high", fs=SR, output="sos")
    hits = signal.sosfilt(low_cut, hits) + glugs()
    return room_tone() + foam() + hits + echoes(hits)


def roll_off(x):
    """The treble ends steeply here."""
    return signal.sosfilt(signal.butter(12, 15850, fs=SR, output="sos"), x)


def record(dry):
    """A steep low-pass cuts the top."""
    low_pass = signal.ellip(12, 0.5, 70, TOP_HZ, fs=SR, output="sos")
    mix = signal.sosfilt(low_pass, dry)
    return roll_off(mix)


dry = scene()
out = record(dry)
master(out)
```